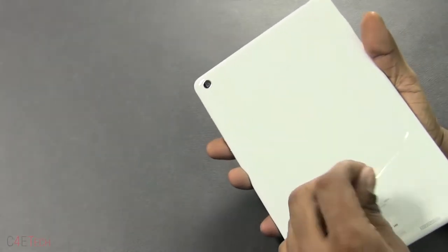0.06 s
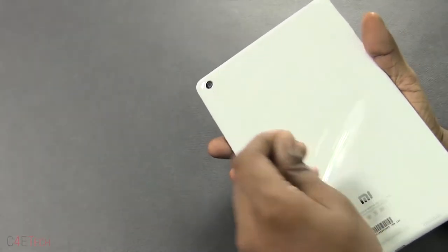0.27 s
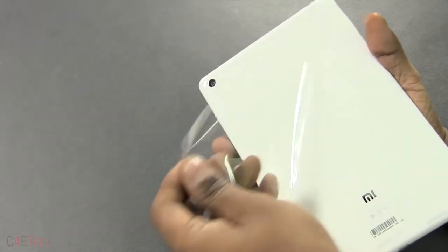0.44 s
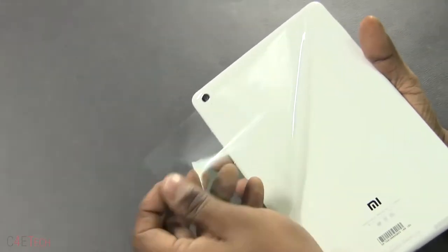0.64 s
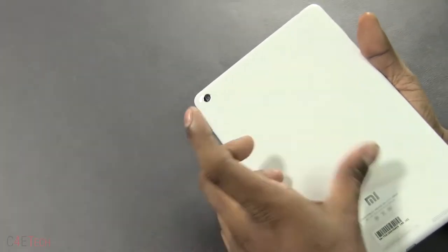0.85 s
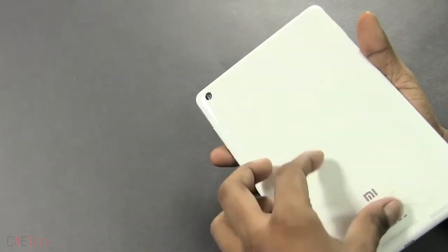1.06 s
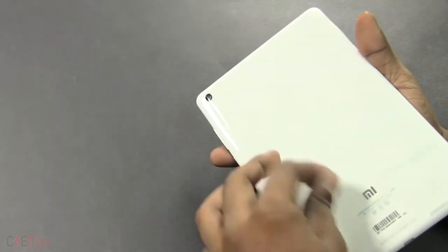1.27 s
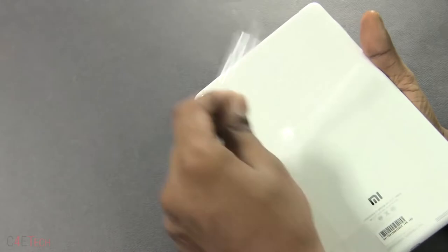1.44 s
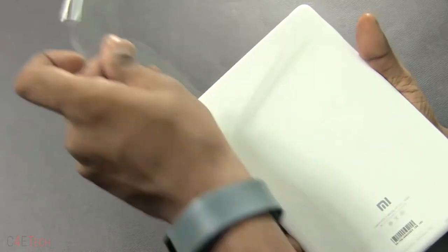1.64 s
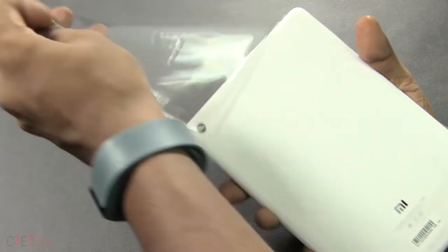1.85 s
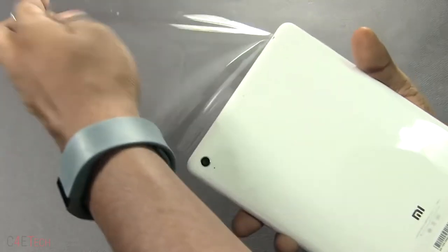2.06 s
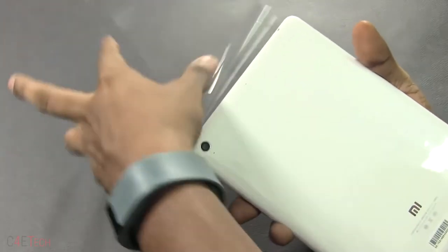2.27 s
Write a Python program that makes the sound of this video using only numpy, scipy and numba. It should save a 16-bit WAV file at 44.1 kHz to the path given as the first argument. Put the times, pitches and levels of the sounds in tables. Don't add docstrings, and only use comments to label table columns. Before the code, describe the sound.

Clinging plastic film ripped twice off a tablet, loud and crackly, with crinkles between pulls

```python
import sys
import numpy as np
from scipy import signal
from scipy.fft import rfft, irfft
from scipy.io import wavfile
from numba import njit

SR = 44100
rng = np.random.default_rng(int(sys.argv[2]) if len(sys.argv) > 2 else 0)


def invert_db(level):
    return 10 ** (np.asarray(level, dtype=float) / 20)


def inscribe(sig):
    pcm = np.round(np.clip(np.atleast_2d(sig).T, -1, 1) * 32767)
    wavfile.write(sys.argv[1], SR, pcm.astype(np.int16))


N = 101429

# time in seconds, level in dB, slips per second,
# crack in Hz, taut film in Hz, share of the taut film in dB, share of the shell thump in dB.
FIRST_PEEL = [
    (.1255, -18, 190, 7000, 3040, 0, -47),
    (.165, -17.5, 344, 7050, 2800, -4.5, -24.5),
    (.21, -20.5, 170, 7740, 2750, -6, -24.5),
    (.3, -18, 265, 7400, 2600, -4.5, -20.5),
    (.385, -17, 384, 8000, 2300, -2, -18),
    (.44, -12.5, 368, 7870, 2100, -4, -15),
    (.51, -17.5, 400, 7687, 2000, -3.5, -13.5),
    (.575, -13.5, 386, 7700, 2160, -5, -12.5),
    (.6, -30, 370.6, 8000, 2200, 7, -1),
]
SECOND_PEEL = [
    (1.382, -30, 700.1, 8100, 2600, -2, -10),
    (1.44, -26, 691.4, 6910, 2315, 0, -9.5),
    (1.457, -17, 450, 6040, 2600, -8, -15),
    (1.53, -17, 419.6, 6804, 2870, -3, -17.5),
    (1.6, -18.5, 359.1, 6650, 2340, -0.5, -11.5),
    (1.67, -18.5, 252.3, 6970, 3000, 1, -13),
    (1.8, -20, 283.8, 7100, 2870, 2.5, -12),
    (1.88, -17.5, 141.4, 7000, 2730, -6, -10),
    (1.94, -17.5, 130.3, 6630, 2742, -10.5, -5),
]
# time in seconds, peak in dB,
# share of the taut film in dB, share of the shell thump in dB.
LONE_SLIPS = [(.0547, -10, -3, -11), (.059, -15, -4, -10), (.065, -15, -4, -10), (.069, -15, -4, -8),
              (.074, -22, -5, -5), (.114, -7, -6, -20), (.119, -7, -6, -20), (.1245, -7, -8, -15),
              (1.9505, -7, -8, -5), (1.9605, -3, -8, -5), (1.9685, -3, -10, -3), (1.9825, -2, -6, -5),
              (1.992, -3, -6, -4), (2.004, -3, -8, -4), (2.016, -11, -3, -4)]
# time in seconds, peak in dB,
# share of the taut film in dB, share of the shell thump in dB, bright crackle in Hz.
CRINKLES = [(.038, -9, -17, -31, 8650), (0.746, 3.5, -1, -1, 6670), (0.757, -1, -8.5, -36, 5795),
            (1.126, -34.5, 17.5, 7.5, 3270), (1.135, -38.5, 5, -16, 5000), (1.142, -59.5, 5.5, -22.5, 4926),
            (1.284, -69.5, -4, -0.5, 7000), (1.3525, -16, -17.5, -11, 6600), (1.372, -12, -19.5, -3, 4200),
            (1.379, -8, -11, -31, 6870), (2.149, -16.5, 9, -8, 4500), (2.151, -25, -10, 15, 3890),
            (2.2016, -21.5, -10.5, -20, 10070), (2.213, -34, 17, 16, 4530), (2.2535, -16.5, -9, -5, 8940),
            (2.2604, -21, -1, -11, 5900), (2.271, -27, 8, -7.5, 4930), (2.294, -27, 16, 12.5, 4170)]
# middle in seconds, half length in seconds, level in dB.
RUSTLES = [
    (1.136, 0.052, -57.5),
    (1.289, 0.04, -70),
    (1.368, 0.021, -46),
    (2.214, 0.022, -44),
    (2.29, 0.032, -40),
]
# centre in Hz, decay by 60 dB in seconds, level in dB.
ROOM_BANDS = [(157.5, 0.082, -1), (450, 0.45, 2), (1187, 0.37, -1), (2100, 0.467, 0), (4200, 0.41, 7),
              (8000, 0.38, -12.5), (12900, 0.3, 5)]
# pitch in Hz, decay by 60 dB in seconds, level in dB.
RINGING_MODES = [(2105, .8, -20), (3585, 1.0, -17), (3671, .86, -13), (3795, 1.25, -7), (3865, 1.2, -13),
                 (3898.5, 1.7, 0), (3926, .7, -5), (4037, .5, -6)]
# frequency in Hz, density in dB per Hz.
AIR_SPECTRUM = [(60, -13), (130, -2), (500, 0), (900, -9), (1400, -11), (1950, -26), (2900, -25.5),
                (15000, -33)]

SLIP_TEAR_S = .0006
SHELL_HZ = 899


@njit
def svf(x, hz, share):
    y, b, l = np.empty(len(x)), 0., 0.
    for i in range(len(x)):
        g = np.tan(np.pi * hz[i] / SR)
        v = (b + g * (x[i] - l)) / (1 + g * (g + share))
        b, l, y[i] = 2 * v - b, l + 2 * g * v, share * v
    return y


def band(x, hz, share):
    hz = np.clip(hz * np.ones(len(x)), 50, .44 * SR)
    once = svf(x + 1e-18, hz, 1. * share)
    return svf(once, hz, 1. * share) * np.sqrt(SR / (0.92 * share * hz))


def floor():
    f = np.arange(N // 2 + 1) * SR / N + 1
    hz, db = np.array(AIR_SPECTRUM).T
    gain = invert_db(np.interp(np.log(f), np.log(hz), db))
    x = irfft(rfft(rng.standard_normal(N)) * gain, N)
    return x * invert_db(-72.5) / np.std(x)


def room(x):
    gap_s, desk_s = 0.0082, 0.0028
    t = np.arange(SR // 2) / SR
    tail = 0
    for hz, t60, db in ROOM_BANDS:
        noise = band(rng.standard_normal(len(t)), hz, 0.69)
        tail = tail + invert_db(db - 60 * t / t60) * noise * np.sqrt(hz / t60)
    tail = tail * np.clip(t / gap_s, 0, 1) ** 2
    tail = tail * invert_db(-2) / np.sqrt(np.sum(tail ** 2))
    tail[0] += 1
    tail[int(desk_s * SR)] += invert_db(-13.5)
    return signal.fftconvolve(x, tail)[:N]


def metal(x):
    out, t = 0, np.arange(N) / SR
    for hz, t60, db in RINGING_MODES:
        r = invert_db(-120 / (t60 * SR))
        stored = np.sqrt(signal.lfilter([1 - r], [1, -r], x ** 2))
        out = out + invert_db(db) * stored * np.sin(2 * np.pi * (hz * t + rng.random()))
    return invert_db(-20.5) * out


def rustle():
    t = np.arange(N) / SR
    gain = invert_db(-36 - 60 * t / .3)
    for middle, half, db in RUSTLES:
        gain = gain + invert_db(db) * np.exp(-((t - middle) / half) ** 2)
    colour = 0
    for hz, width, db in [(4500, 1.0, 0), (2000, .7, -11), (1100, .6, -13.5), (10500, 1.0, -3.5)]:
        colour = colour + invert_db(db) * band(rng.standard_normal(N), hz, width)
    return gain * colour


def torn(at, size, last_s):
    x = np.bincount(at, size, N)[:N]
    fading = signal.lfilter([1], [1, -np.exp(-1 / (last_s * SR))], np.abs(x))
    return x + invert_db(-4) * rng.standard_normal(N) * fading / np.sqrt(last_s * SR)


def film(at, size, crack_hz, film_hz, film_db, shell_db, last_s, hiss=0.,
         shell_hz=SHELL_HZ, film_width=1.25, flap_db=-12):
    crack_size, film_size, shell_size = size * invert_db(1.6 * rng.standard_normal((3, len(at))))
    crack = torn(at, crack_size, last_s) + hiss * rng.standard_normal(N)
    drum = torn(at, film_size * invert_db(film_db), last_s)
    thump = torn(at, shell_size * invert_db(shell_db), last_s)
    air = crack * np.sign(rng.standard_normal(N))
    out = band(crack, crack_hz, .66) + invert_db(-18) * band(air, 12000, .6)
    out = out + band(drum, film_hz, film_width)
    out = out - band(thump, shell_hz, 0.63)
    return out + invert_db(flap_db) * band(thump, 243, 1.68)


def crinkles():
    start, db, film_db, shell_db, bright_hz = np.array(CRINKLES).T
    at = (start * SR).astype(int)
    latest = np.searchsorted(at, np.arange(N), side="right") - 1
    bright = bright_hz[np.clip(latest, 0, None)]
    return film(at, invert_db(db - 2.5), bright, 2300, film_db, shell_db, .001,
                shell_hz=1050, film_width=.9, flap_db=-19)


def lone_slips():
    start, db, film_db, shell_db = np.array(LONE_SLIPS).T
    at = (start * SR).astype(int)
    return film(at, invert_db(db + 4), 7000, 2600, film_db, shell_db, SLIP_TEAR_S)


def peel(table, shell_hz):
    uneven, scatter_db, hiss_db = .3, 1.8, -4.5
    t, rows = np.arange(N) / SR, np.array(table).T
    db, rate, crack_hz, film_hz, film_db, shell_db = (np.interp(t, rows[0], r) for r in rows[1:])
    on = (t > rows[0, 0]) & (t < rows[0, -1])
    rate = np.clip(rate, 40, 1200)
    gap_chance, size_chance = rng.standard_normal((2, 900))
    slips_due = np.cumsum(np.exp(uneven * gap_chance))
    at = np.searchsorted(np.cumsum(on * rate / SR), slips_due)
    keep = at < N
    at = at[keep]
    size = invert_db(db[at] - 6 + scatter_db * size_chance[keep]) * np.sqrt(SR / rate[at])
    hiss = on * invert_db(db + hiss_db)
    return film(at, size, crack_hz, film_hz, film_db[at], shell_db[at], SLIP_TEAR_S, hiss, shell_hz)


def scene():
    rips = peel(FIRST_PEEL, 723) + peel(SECOND_PEEL, SHELL_HZ)
    in_room = room(rips + lone_slips() + crinkles())
    return np.tile(in_room + rustle() + metal(rips) + floor(), (2, 1))


def band_limit(x):
    return signal.sosfilt(signal.butter(12, 16620, fs=SR, output="sos"), x)


def record(dry):
    x = signal.sosfilt(signal.butter(2, 170, "high", fs=SR, output="sos"), dry)
    x = np.clip(x, -.9, .9)
    mix = signal.sosfilt(signal.ellip(8, .2, 70, 15900, fs=SR, output="sos"), x)
    return band_limit(mix)


dry = scene()
out = record(dry)
inscribe(out)
```